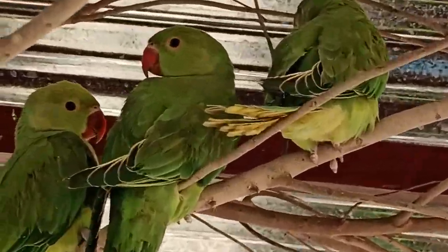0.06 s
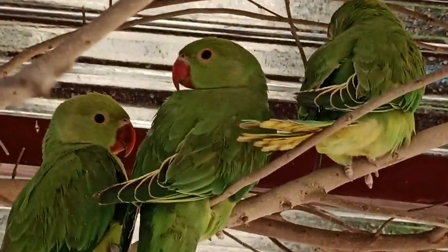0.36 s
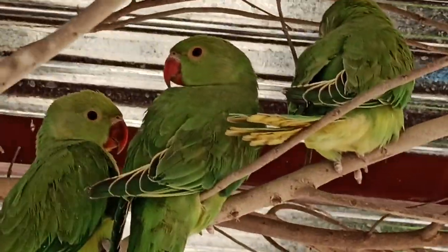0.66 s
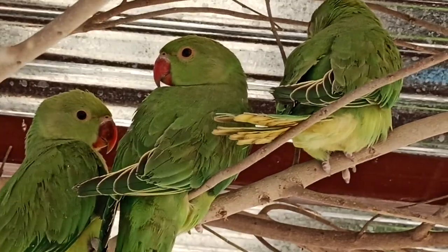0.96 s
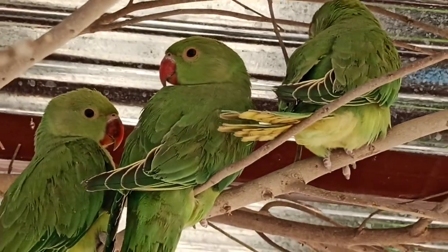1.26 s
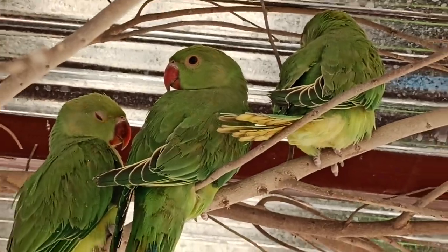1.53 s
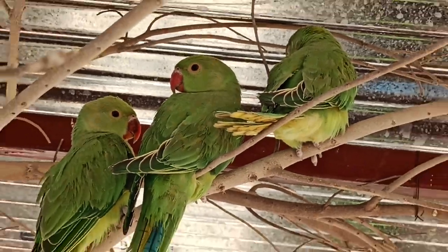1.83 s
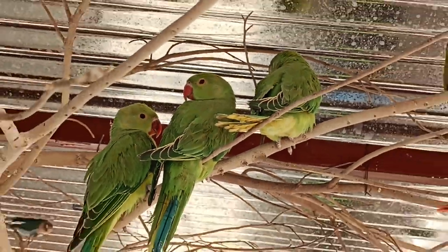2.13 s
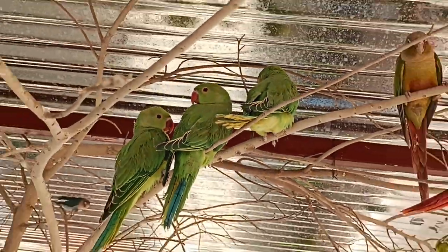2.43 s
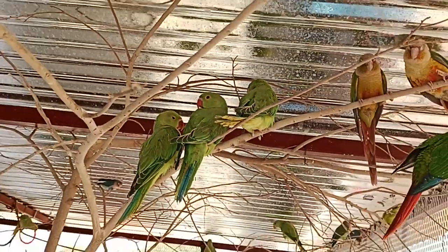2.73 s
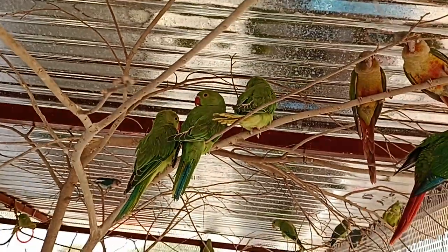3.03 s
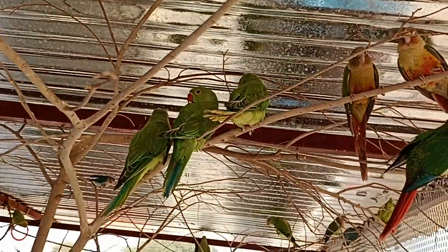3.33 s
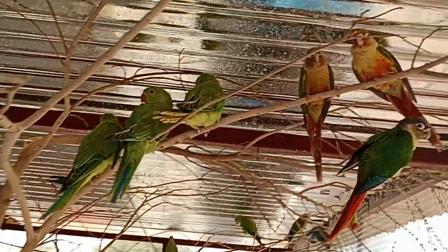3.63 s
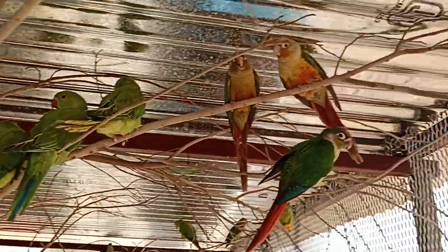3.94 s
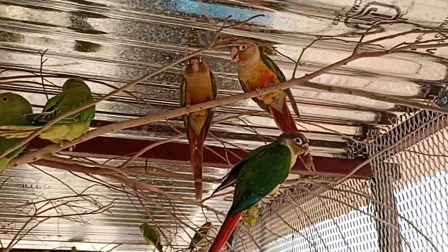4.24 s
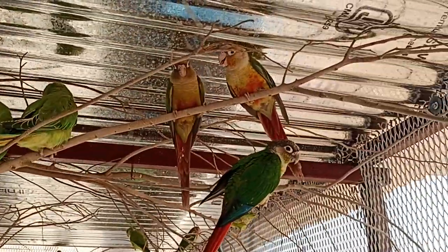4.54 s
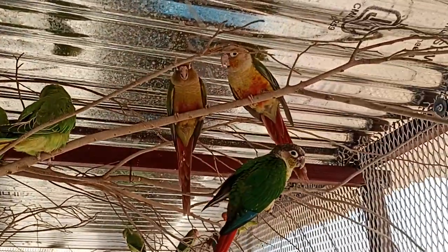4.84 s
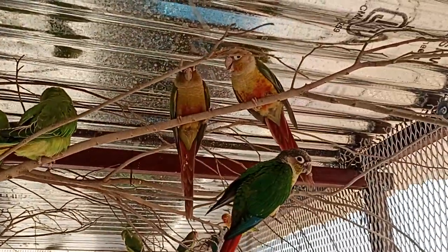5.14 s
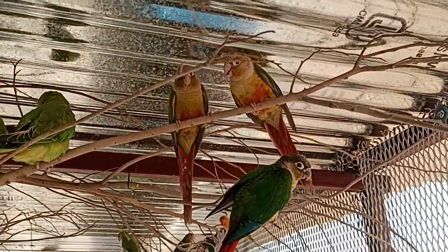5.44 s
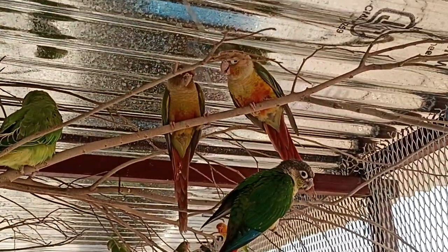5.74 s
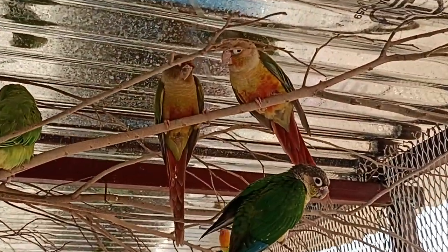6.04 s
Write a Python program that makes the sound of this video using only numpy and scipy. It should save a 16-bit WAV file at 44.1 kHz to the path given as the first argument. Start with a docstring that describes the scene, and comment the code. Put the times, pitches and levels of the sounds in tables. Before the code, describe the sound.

Sharp parrot chirps, squawks and breathy begging rasps overlap in an aviary, over distant doves and soft puffs of air on the microphone.

```python
"""A breathy screech and a young parrot's begging rasp, twice a second, open under an aviary's tin roof.
Close by, left of the microphone, small parrots chirp, yelp and shriek: each call is a syrinx tone
roughened by a buzz, each rasp is chopped breath. Beaks click and a piece of metal clinks, then rocks.
Doves coo farther off, over the wash of other cages; puffs of air rumble on the right microphone port."""
import sys
import numpy as np
from scipy import signal
from scipy.fft import rfft, irfft
from scipy.io import wavfile
from scipy.ndimage import map_coordinates

SR = 44100
rng = np.random.default_rng(int(sys.argv[2]) if len(sys.argv) > 2 else 0)


def transcribe(signal):
    """Save signal, clipped to [-1, 1], as a 16-bit WAV file at the path in sys.argv[1]."""
    frames = np.atleast_2d(signal).T
    limited = np.clip(frames, -1, 1)
    pcm = np.round(limited * 32767).astype(np.int16)
    wavfile.write(sys.argv[1], SR, pcm)


N = 268304

# ring of the aviary (frequency [Hz], time to fall 60 dB [s])
AVIARY_T60 = [(200, 0.46), (1000, 0.37), (3000, 0.29), (6000, 0.28), (13000, 0.24)]
# wash of far cages, eddies at the ports, microphone response (frequency [Hz], level [dB])
WASH_SPECTRUM = [(20, 15.5), (80, -9), (300, 0), (1000, -2.5), (1500, 4.5), (3300, 12), (4400, -12),
                 (6000, 7), (7500, -6.5), (9500, -12.5), (12800, -23), (15500, -31.5)]
EDDY_SPECTRUM = [(20, -50), (40, -7), (65, 9.5), (110, 8.5), (170, -2), (250, -15.5), (350, -44.5),
                 (600, -30), (1500, -63)]
MIC_RESPONSE = [(20, -3), (60, 4), (6900, -0.5), (7500, -0.5), (9500, -3), (11000, -1.5), (12800, 12),
                (14600, 8.5), (15800, -6.5)]
# spells of wind (time [s], length [s], build-up [s], level [dB])
GUSTS = [(1.14, 1.98, 0.49, -54.5), (3.105, 1.5, .1, -72.5), (3.6, 1.029, .02, -54.5),
         (4.798, 0.57, 0.034, -74.5)]
# brief puffs of air (time [s], level [dB])
PUFFS = [(.7, -61), (1.25, -60), (1.386, -55), (1.585, -47), (1.728, -44), (1.931, -39.5), (2.047, -42),
         (2.282, -40.5), (2.519, -40.5), (2.976, -46), (3.079, -41.5), (3.626, -43), (3.831, -42),
         (3.932, -36), (4.4, -51)]
# low bumps and distant doves (time [s], length [s], pitch [Hz], level [dB], left over right [dB])
BUMPS = [(0.407, .12, 244, -73, 5), (4.531, 0.011, 134.6, -38, -24), (5.52, 0.22, 171.4, -62.5, 0)]
COOS = [(0.036, .21, 526, -64.5, -1), (.21, .31, 607, -67, -3), (.477, 0.27, 547, -60, 1.5),
        (0.579, 0.2, 891, -66.5, 0), (1.198, 0.14, 532.6, -58.5, 4), (1.499, 0.18, 514, -65, 8),
        (1.972, 0.066, 706, -72, 3), (2.3, 0.12, 515, -70, 15), (2.545, .22, 528, -71, -3),
        (2.97, 0.14, 518, -69.5, 19), (3.264, .1, 516, -68.5, 14), (3.44, 0.056, 530, -65, 8),
        (4.062, .16, 514, -56, 4.5), (4.748, .19, 524.5, -57.5, 0.5), (4.796, 0.053, 695, -57.5, -8),
        (5.017, 0.11, 744, -59.5, -7.5), (5.049, 0.12, 522, -58.5, 1), (5.268, 0.069, 706, -56, -4),
        (5.856, 0.25, 512, -67, 2)]
# modes of the piece of metal (frequency [Hz], level [dB], time to fall 60 dB [s])
METAL_MODES = [(1218, 1.5, 0.18), (1245, -4, 0.21), (3450, -22, 0.41), (5320, -13.5, 0.58),
               (6140, -18.5, 0.47)]
# knocks on it (time [s], level [dB])
CLINKS = [(0.061, -51), (0.119, -50.5), (0.4, -45), (.442, -44), (1.19, -53), (2.098, -43.5), (2.134, -41),
          (4.383, -42.5), (4.58, -52), (4.806, -44), (4.833, -47)]
# beak snaps (time [s], level [dB], brightness [dB])
BEAK_CLICKS = [(1.367, -45, 13), (2.199, -39, -6), (3.105, -25, -4), (3.096, -19.5, -4), (3.18, -19, -5),
               (3.407, -53, 4), (4.359, -44, 20)]
# their crack (frequency [Hz], level [dB], change with brightness [dB/dB])
CRACK_SPECTRUM = [(1000, -66, 0), (2200, 11.5, -1), (6500, 10.5, -0.5), (9000, -15, 1), (13000, -8, 1),
                  (15500, -37, 1)]

# throat resonances of the three rasps (frequency [Hz], level [dB])
BEG_THROAT = [(900, -38.5), (1200, -23.5), (1420, -6.5), (1800, -2), (2500, -10.5), (3150, 1), (3650, 7),
              (4350, -9), (5300, 2), (6100, -8.5), (7200, -43.5), (10000, -53), (12500, -67), (15000, -73)]
SCREECH_THROAT = [(700, -37), (1200, -23.5), (1700, -21), (2450, -15), (3600, -11.5), (4500, -14),
                  (5500, 0.5), (6600, -4), (7700, -14.5), (9500, -26.5), (12500, -22.5), (14400, -40.5),
                  (15500, -52)]
CHURR_THROAT = [(2000, -43), (2750, -40), (3100, 13.5), (3400, 14.5), (3900, 11.5), (4300, -67),
                (6000, -35)]
# begging rasps and breathy screeches (time [s], length [s], level [dB], level change [dB])
BEGS = [(.01, .15, -44.5, -3), (0.424, 0.28, -41.5, -19), (0.951, .17, -42, 0), (1.455, 0.21, -49.5, 13),
        (1.945, 0.47, -44, -1.5), (2.467, .28, -39.5, -1), (2.949, 0.326, -41.5, -0.5),
        (3.499, .28, -40.5, 2.5), (4.023, 0.26, -37, -14), (4.492, .27, -44, -1), (5.682, 0.23, -45.5, -14)]
SCREECHES = [(0, 0.36, -47, -15.5), (0.297, 0.52, -55, -7), (1.172, 0.18, -56.5, 2),
             (1.362, 0.15, -57, 9.5), (2.018, .21, -69.5, 29.5), (2.462, 0.69, -41.5, -20.5),
             (3.657, 0.22, -57.5, 6), (4.253, 0.46, -53, -13.5), (4.841, 0.21, -40.5, -27),
             (5.03, 0.64, -47, -24.5), (5.658, 0.5, -37.5, -40.5)]
# soft churrs (time [s], length [s], level [dB])
CHURRS = [(0.81, .154, -55), (5.203, 0.42, -54.5), (5.831, 0.15, -60.5)]

# voices of the near parrots (syrinx buzz rate [Hz], relative level of each harmonic [dB])
CHIRP_VOICE = (130, [5.5, -3.5, -26, -24.5])
YELP_VOICE = (120, [-3, 1.5, 6.5, -19.5, -22.5, -29.5])
SQUAWK_VOICE = (170, [-10, 9, -15.5, 5.5, -10, -41, -23, -20.5])
WAIL_VOICE = (125, [13.5, -5.5, -12, -65, -57, -26.5])
SHRIEK_VOICE = (200, [0, -22, -14.5])
CREAK_VOICE = (90, [-10, -1.5, -13, -20])
WHISTLE_VOICE = (90, [0])
# thin whistles (time [s], length [s], first pitch [Hz], last pitch [Hz], level [dB], jitter [share])
WHISTLES = [(0.551, 0.12, 1470, 1373, -52, 0.057), (0.719, 0.12, 3270, 2840, -52, 0.0065),
            (.9, 0.1, 3055, 2930, -50.5, 0.007), (2.831, 0.076, 3230, 3187, -56, .015),
            (0.806, 0.048, 4500, 4320, -55.5, 0.019), (.82, 0.052, 5800, 5420, -59, .014),
            (1.773, 0.027, 2860, 2727, -42, 0.007), (1.816, 0.033, 2550, 2290, -51.5, 0.073),
            (3.744, 0.056, 6280, 5370, -49, 0.0044), (5.825, 0.14, 3420, 2954, -49, 0.058),
            (6.025, .065, 3960, 3320, -52.5, 0.047)]
# harsh overlapping shrieks and short falling yips
# (time [s], length [s], first pitch [Hz], last pitch [Hz], level [dB], level change [dB], jitter [share])
SHRIEKS = [(4.532, 0.0172, 4820, 5700, -22, 1.5, 0.02), (4.549, 0.02, 3935, 3260, -16.5, -17.5, 0.08),
           (4.55, 0.061, 5253, 5315, -21, 3.5, 0.087), (4.551, .06, 6830, 5990, -25.5, 4.5, 0.036),
           (4.608, 0.01, 3190, 4270, -24, -1, 0.088), (4.616, 0.077, 5470, 5330, -16.5, -8.5, 0.063),
           (4.746, .091, 5505, 5013, -20.5, -3.5, 0.044), (4.793, 0.034, 4360, 3783, -22.5, -3.5, 0.03)]
YIPS = [(2.253, 0.0253, 2535, 1780, -25.5, -15, .07), (4.834, 0.01, 2180, 1780, -30, 4, .08)]
# a squawk, a rising creak and the wail it breaks into (time [s], pitch [Hz], level [dB])
SQUAWK_ARC = [(2.26, 1736, -28), (2.285, 1513, -23), (2.344, 1403, -29.5), (2.366, 1455, -24)]
CREAK_ARC = [(4.06, 1497, -48), (4.092, 1742, -28), (4.125, 1790, -36)]
WAIL_ARC = [(4.106, 2016, -31), (4.128, 2253, -22), (4.18, 2543, -24.5), (4.21, 2318, -20.5),
            (4.272, 2127, -39)]
# clear chirps and bright yelps
# (time [s], length [s], pitch [Hz], starting pitch offset [share], time to peak [s], level [dB])
CHIRPS = [(1.518, 0.057, 3283, -.05, 0.013, -22), (2.358, 0.033, 3610, -0.16, 0.011, -30),
          (3.025, 0.055, 3400, -0.59, 0.031, -24), (3.095, 0.016, 3250, 0.014, 0.002, -24.5)]
YELPS = [(3.18, 0.053, 2125, 0.25, 0.03, -14), (3.42, 0.038, 2159, -0.021, 0.0088, -26),
         (3.471, 0.047, 2100, 0.13, 0.016, -20.5), (3.583, 0.1, 2087, 0.12, 0.023, -18),
         (3.851, 0.17, 2226, -0.13, 0.017, -18.5)]
SETTLE_S = 0.009  # how quickly either settles onto its pitch


def amp(db):
    """Decibels to gain."""
    return 10 ** (np.asarray(db) / 20)


def unit_rms(x):
    """Scales to rms 1."""
    return x / np.sqrt(np.mean(x ** 2, axis=-1, keepdims=True) + 1e-20)


def curve_at(points, hz):
    """Reads a curve on a log-frequency axis."""
    f, value = np.transpose(points)
    return np.interp(np.log(hz + 1), np.log(f + 1), value)


def filtered(x, spectrum):
    """Shapes a sound by a curve in dB."""
    hz = np.fft.rfftfreq(x.shape[-1], 1 / SR)
    return irfft(rfft(x) * amp(curve_at(spectrum, hz)), x.shape[-1])


def noise(spectrum, size):
    """Noise of rms 1 with the given spectrum."""
    return unit_rms(filtered(rng.standard_normal(size), spectrum))


def wander(rate_hz, size):
    """Smooth random motion of rms about 1, up to about the given rate."""
    whole = max(size, SR)
    lowpass = 1 + (np.fft.rfftfreq(whole, 1 / SR) / rate_hz) ** 3
    return unit_rms(irfft(rfft(rng.standard_normal(whole)) / lowpass, whole))[:size]


def phase_of(hz):
    """Running phase of a moving pitch."""
    return 2 * np.pi * np.cumsum(hz) / SR


def fades(t, rise_s, fall_s):
    """Soft start and end of a sound."""
    onset = np.sin(np.pi / 2 * np.clip((t - t[0]) / rise_s, 0, 1))
    return onset * np.sin(np.pi / 2 * np.clip((t[-1] - t) / fall_s, 0, 1))


def sides(pan_db):
    """Left and right gains; positive is left of the microphone."""
    return amp([[pan_db / 2], [-pan_db / 2]])


def add(mix, s, sound):
    """Mixes a stereo sound in at time s."""
    part = mix[:, max(round(s * SR), 0):][:, :sound.shape[1]]
    part += sound[:, :part.shape[1]]


def aviary(x, early_db, tail_db, count=10, size=16384):
    """Each perch sends the microphone its own echoes off the tin roof, then a short diffuse tail."""
    hz, t, bands = signal.stft(rng.standard_normal((2, size)), SR, nperseg=256)
    decay = amp(-60 * t / curve_at(AVIARY_T60, hz)[:, None])
    tail = signal.istft(bands * decay * np.minimum(t / 0.012, 1), SR, nperseg=256)[1]
    echo = amp(tail_db) * unit_rms(tail) / np.sqrt(size)
    for side in echo:
        delay_s = rng.uniform(.001, .024, count)
        side[(delay_s * SR).astype(int)] += amp(early_db) * rng.choice([-1, 1], count) / np.sqrt(count)
        side[rng.integers(0, count)] += 1  # the direct path
    wet = signal.fftconvolve(x[None], echo, axes=1)
    return wet * np.linalg.norm(x) / np.linalg.norm(wet, axis=1, keepdims=True)


def far_wash(level_db=-63.5, flicker_db=2):
    """The faint wash of the farther cages."""
    wash = np.array([noise(WASH_SPECTRUM, N) for _ in range(2)])
    return sides(4) * wash * amp(level_db + flicker_db * wander(36, N))


def far_flock(level_db=-65, count=30):
    """Short falling chirps from the farther cages, mostly echo at this distance."""
    mix = np.zeros((2, N))
    for when, high, long, loud in rng.random((count, 4)):
        t = np.arange(0, 0.01 + 0.16 * long, 1 / SR)
        pitch = (2700 + 2600 * high) * (1 - 0.17 * t / t[-1] + 0.025 * wander(280, len(t)))
        note = amp(level_db + 6 * loud) * np.sin(phase_of(pitch)) * fades(t, 0.014, 0.0091)
        add(mix, when * N / SR, sides(6) * aviary(note, early_db=0, tail_db=4))
    return mix


def dove_coo(s, length, hz, level_db, pan_db, jitter=0.039, arch=0.023):
    """An almost pure note with a slight arch, from a distant dove."""
    t = np.arange(0, length, 1 / SR)
    pitch = hz * (1 + arch * (np.sin(np.pi * t / length) - .5) + jitter * wander(71, len(t)))
    tone = unit_rms(np.sin(phase_of(pitch)) * fades(t, length / 6, length / 4))
    return s, sides(pan_db) * aviary(amp(level_db) * tone, early_db=-8, tail_db=0)


def bump(s, length, hz, level_db, pan_db):
    """A dull low push of uneven cycles, with no echo."""
    t = np.arange(0, length, 1 / SR)
    pitch = hz * (1 + .06 * wander(90, len(t)))
    push = np.sin(phase_of(pitch)) * fades(t, length / 3, length / 2)
    return s, sides(pan_db) * amp(level_db) * unit_rms(push)


def port_wind(lumpy=0.38, left_db=-11, right_db=3, calm_db=-76.5, drop_s=0.064, puff_s=.014):
    """Low turbulence, unrelated at the two microphone ports and far stronger on the right."""
    t = np.arange(N) / SR
    eddies = np.array([noise(EDDY_SPECTRUM, N) * np.exp(lumpy * wander(29.5, N)) for _ in range(2)])
    spells = sum(amp(db) * np.clip((t - s) / rise, 0, 1) * np.clip((s + length - t) / drop_s, 0, 1)
                 for s, length, rise, db in GUSTS)
    puffs = sum(amp(db) * np.exp(-((t - s) / puff_s) ** 2) for s, db in PUFFS)
    return amp([[left_db], [right_db]]) * unit_rms(eddies) * (amp(calm_db) + spells + puffs)


def metal_clink(s, level_db, spread_db=3):
    """A knock sets the metal ringing; each one favours other modes."""
    t = np.arange(SR // 2) / SR
    ring = sum(amp(db + spread_db * rng.uniform(0.15, 1) - 60 * t / t60) * np.sin(2 * np.pi * hz * t)
               for hz, db, t60 in METAL_MODES)
    return s, sides(-1) * aviary(amp(level_db) * ring * fades(t, .012, .05), early_db=-6, tail_db=-2)


def metal_rocking(start_s=5.016, gap_s=.128, gap_ratio=.965, level_db=-50, uneven_db=2, count=9):
    """Times and levels of the knocks as the metal rocks, a little quicker each time."""
    times = start_s + gap_s * (1 - gap_ratio ** np.arange(count)) / (1 - gap_ratio)
    return list(zip(times, level_db + uneven_db * rng.standard_normal(count)))


def beak_click(s, level_db, bright_db):
    """A beak snaps shut close by: a crack of a few milliseconds."""
    t = np.arange(SR // 40) / SR
    spectrum = [(hz, db + tilt * bright_db) for hz, db, tilt in CRACK_SPECTRUM]
    crack = amp(level_db) * noise(spectrum, len(t)) * np.exp(-t / .003) * fades(t, .001, .005)
    return s, sides(8) * aviary(crack, early_db=-8, tail_db=-10)


def rasp(row, throat, grain, pan_db, rise_s, quiver=0.01763):
    """Turbulent breath, chopped unevenly by the syrinx, through a throat that quivers."""
    s, length, level_db, change_db = row
    t = np.arange(0, length, 1 / SR)
    place = np.cumsum(1 + quiver * wander(59.7, len(t)))  # reading faster raises all the resonances
    breath = map_coordinates(noise(throat, SR), [place], order=5, mode="wrap")
    chopped = unit_rms(breath * np.exp(grain * wander(180, len(t))))
    strength = amp(level_db + change_db * t / length) * fades(t, min(rise_s, length / 3), length / 6)
    return s, sides(pan_db) * aviary(chopped * strength, early_db=2.5, tail_db=-6)


def syrinx(t, pitch, level_db, voice, jitter, pan_db, breath_db, overtone_db=0, top_hz=13500):
    """A near parrot's tone and breath: a buzz shakes the pitch, random flutter both pitch and level."""
    buzz_hz, harmonics = voice
    buzz = np.sin(phase_of(buzz_hz * (1 + 0.048 * wander(42, len(t)))))
    hz = pitch * (1 + jitter * (buzz + 0.776 * wander(3 * buzz_hz, len(t))))
    phase = phase_of(hz)
    tone = sum(amp(db + overtone_db * (k > 1)) * np.sin(k * phase) / (1 + (k * hz / top_hz) ** 20)
               for k, db in enumerate(harmonics, 1))
    tone /= np.sqrt(np.sum(amp(harmonics) ** 2) / 2)
    breath = amp(breath_db) * noise(SCREECH_THROAT, SR)[:len(t)]
    flutter = 1 + 0.32 * wander(73, len(t))
    strength = amp(level_db - 1.5) * flutter * fades(t, 0.0024, 0.014)
    return sides(pan_db) * aviary((tone + breath) * strength, early_db=-0.5, tail_db=-6.5)


def whistle(s, length, first_hz, last_hz, level_db, jitter, ends_db=-6):
    """A thin falling note, loudest in the middle."""
    t = np.arange(0, length, 1 / SR)
    pitch = np.geomspace(first_hz, last_hz, len(t))
    arch_db = ends_db * (2 * t / length - 1) ** 2
    return s, syrinx(t, pitch, level_db + arch_db, WHISTLE_VOICE, jitter, pan_db=9, breath_db=-36)


def sliding_cry(row, voice, pan_db, breath_db):
    """A rough cry that slides evenly from one pitch to another."""
    s, length, first_hz, last_hz, level_db, change_db, jitter = row
    t = np.arange(0, length, 1 / SR)
    pitch = np.geomspace(first_hz, last_hz, len(t))
    return s, syrinx(t, pitch, level_db + change_db * t / length, voice, jitter, pan_db, breath_db)


def bending_cry(arc, voice, jitter, pan_db, breath_db):
    """A cry that bends along an arc of pitch and level."""
    s, hz, db = np.transpose(arc)
    t = np.arange(s[0], s[-1], 1 / SR)
    return s[0], syrinx(t, np.interp(t, s, hz), np.interp(t, s, db), voice, jitter, pan_db, breath_db)


def chirp(s, length, hz, offset, peak_s, level_db, swell_db=11, fade_s=0.027, fade_db=10):
    """A clear note close by that slides onto its pitch, swells and dies away ever faster."""
    t = np.arange(0, length, 1 / SR)
    attack_db = -swell_db * np.maximum(1 - t / peak_s, 0)
    release_db = -fade_db * (np.maximum(t - peak_s, 0) / fade_s) ** 2
    pitch = hz * (1 + offset * np.exp(-t / SETTLE_S))
    return s, syrinx(t, pitch, level_db + attack_db + release_db, CHIRP_VOICE,
                     jitter=0.018, pan_db=9.5, breath_db=-29)


def yelp(s, length, hz, offset, peak_s, level_db, swell_db=13, fade_db=16, relax_s=0.043, sag_per_s2=4):
    """A bright note close by that sags in pitch; as the effort relaxes the overtones fade first."""
    t = np.arange(0, length, 1 / SR)
    attack_db = -swell_db * np.maximum(1 - t / peak_s, 0)
    release_db = -fade_db * (1 - np.exp(-np.maximum(t - peak_s, 0) / relax_s))
    pitch = hz * (1 + offset * np.exp(-t / SETTLE_S) - sag_per_s2 * t ** 2)
    return s, syrinx(t, pitch, level_db + attack_db + release_db, YELP_VOICE,
                     jitter=0.024, pan_db=7.5, breath_db=-22, overtone_db=0.63 * release_db)


def scene():
    """Near parrots, metal and distant doves over the far cages and the wind on the microphone."""
    sounds = [chirp(*row) for row in CHIRPS] + [yelp(*row) for row in YELPS]
    sounds += [whistle(*row) for row in WHISTLES]
    sounds += [sliding_cry(row, SHRIEK_VOICE, pan_db=7.5, breath_db=-24.5) for row in SHRIEKS]
    sounds += [sliding_cry(row, WAIL_VOICE, pan_db=6.5, breath_db=-0.5) for row in YIPS]
    sounds += [bending_cry(CREAK_ARC, CREAK_VOICE, jitter=0.024, pan_db=4.5, breath_db=-22),
               bending_cry(WAIL_ARC, WAIL_VOICE, jitter=0.044, pan_db=5.5, breath_db=-24),
               bending_cry(SQUAWK_ARC, SQUAWK_VOICE, jitter=0.038, pan_db=6.5, breath_db=-12.5)]
    sounds += [rasp(row, BEG_THROAT, grain=0.19, pan_db=7, rise_s=0.03) for row in BEGS]
    sounds += [rasp(row, SCREECH_THROAT, grain=0.34, pan_db=8.5, rise_s=0.004) for row in SCREECHES]
    sounds += [rasp((*row, 0), CHURR_THROAT, grain=0.084, pan_db=11, rise_s=0.0023) for row in CHURRS]
    sounds += [dove_coo(*row) for row in COOS]
    sounds += [metal_clink(*row) for row in CLINKS + metal_rocking()]
    sounds += [beak_click(*row) for row in BEAK_CLICKS] + [bump(*row) for row in BUMPS]
    mix = port_wind() + far_wash() + far_flock()
    for s, sound in sounds:
        add(mix, s, sound)
    return mix


def record(dry):
    """The microphone lifts the bass near 60 Hz, dips at 9.5 kHz, peaks near 13 kHz and cuts the top."""
    band_limit = signal.firwin(511, 15780, window=("kaiser", 9), fs=SR)
    return signal.oaconvolve(filtered(dry, MIC_RESPONSE), band_limit[None], "same")


dry = scene()
out = record(dry)
transcribe(out)
```